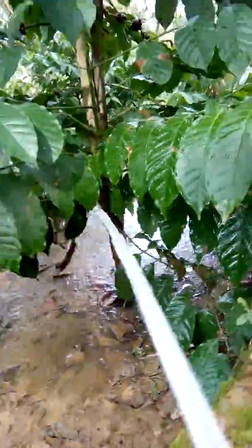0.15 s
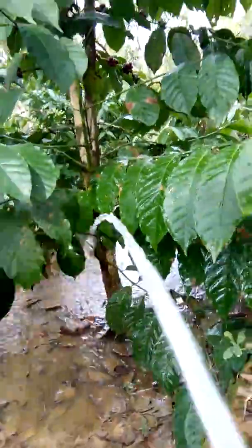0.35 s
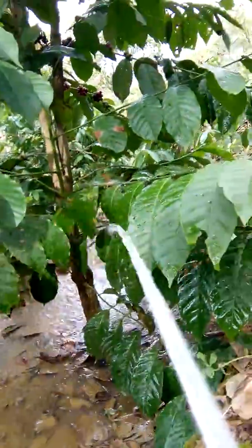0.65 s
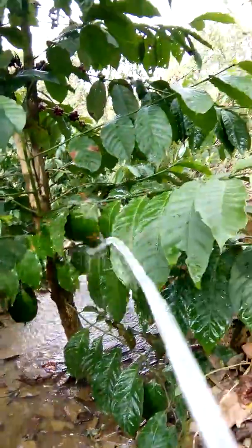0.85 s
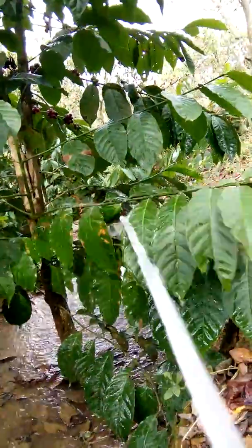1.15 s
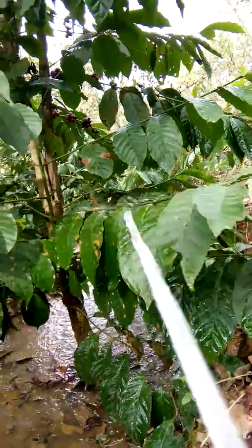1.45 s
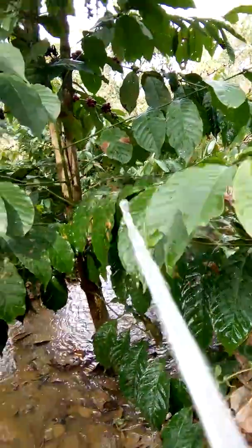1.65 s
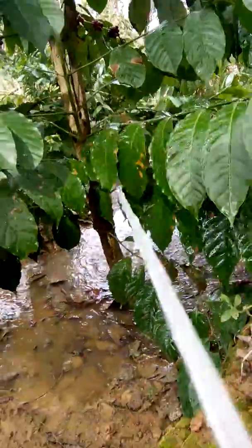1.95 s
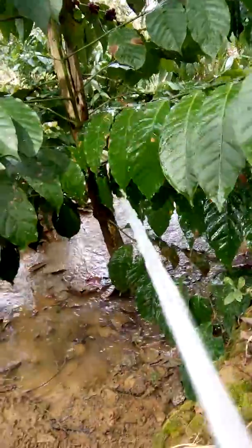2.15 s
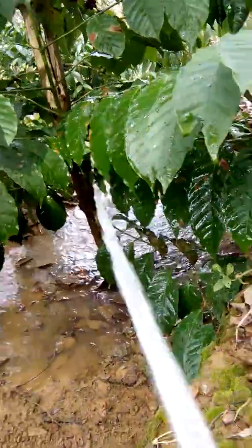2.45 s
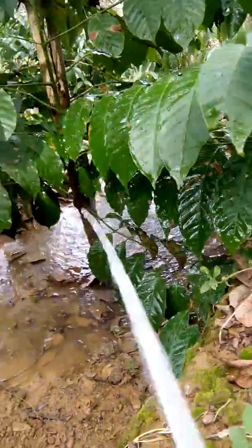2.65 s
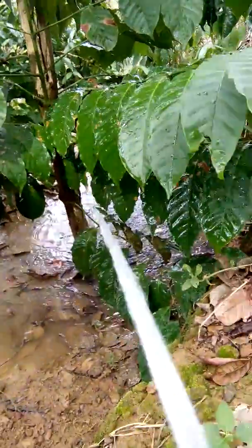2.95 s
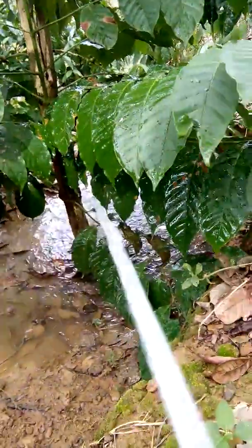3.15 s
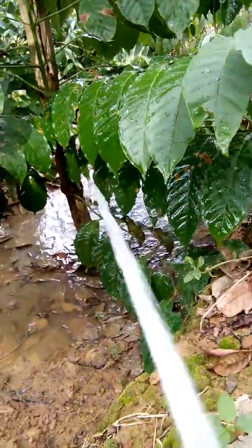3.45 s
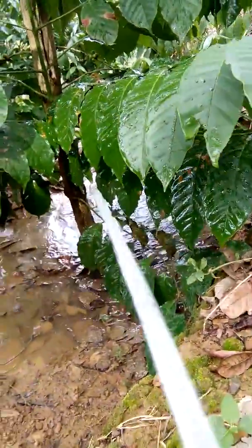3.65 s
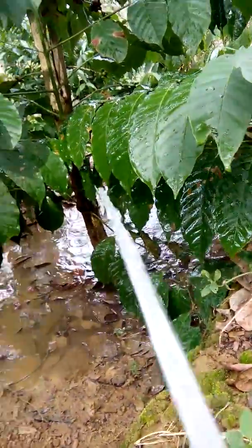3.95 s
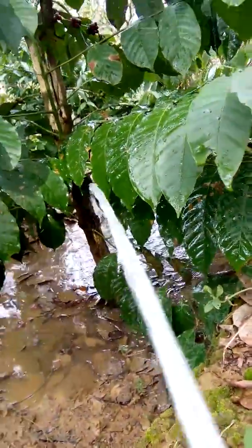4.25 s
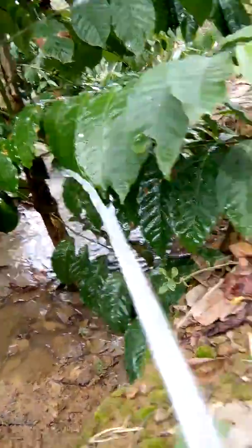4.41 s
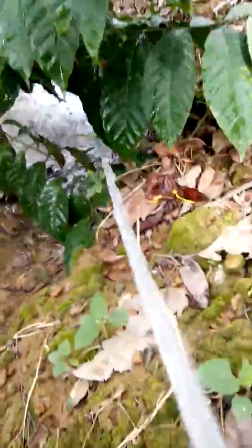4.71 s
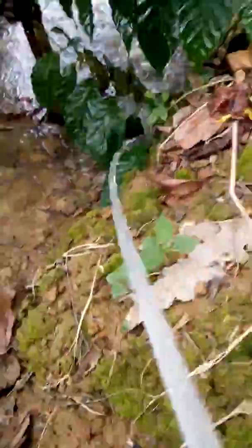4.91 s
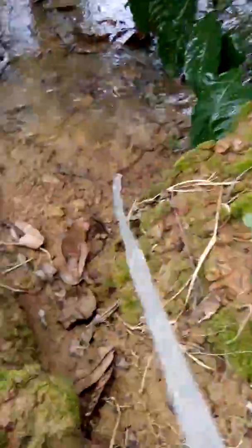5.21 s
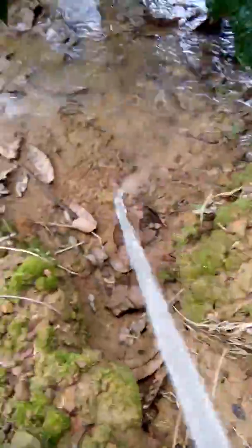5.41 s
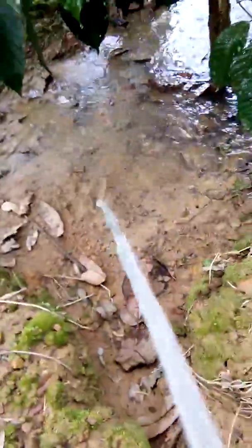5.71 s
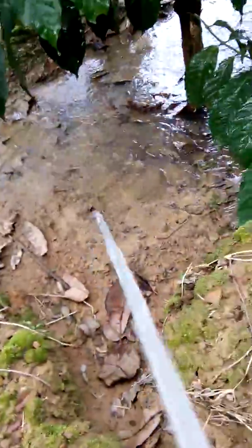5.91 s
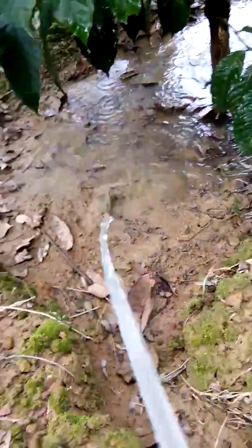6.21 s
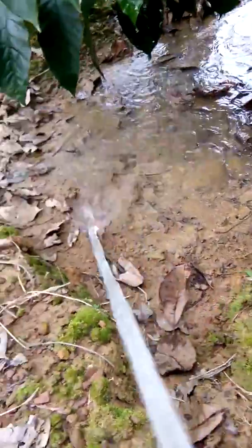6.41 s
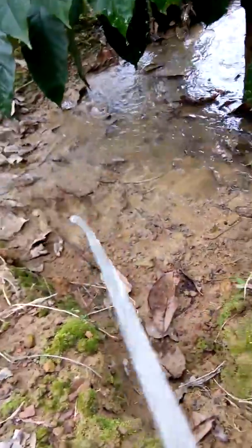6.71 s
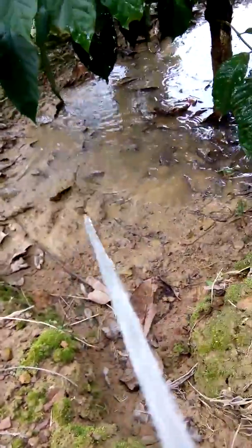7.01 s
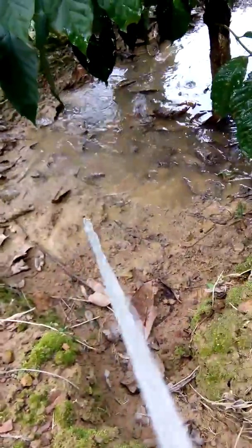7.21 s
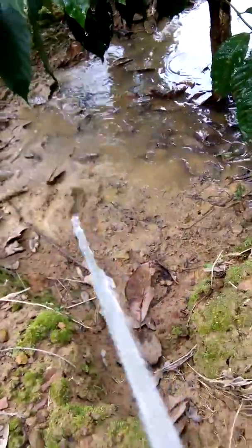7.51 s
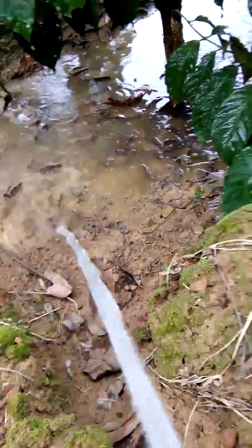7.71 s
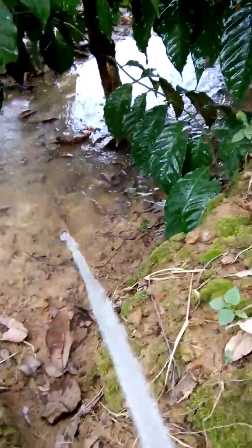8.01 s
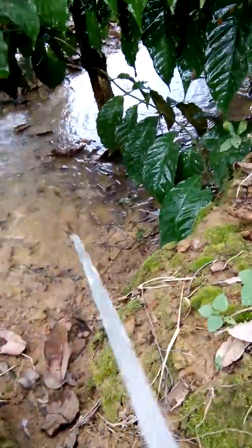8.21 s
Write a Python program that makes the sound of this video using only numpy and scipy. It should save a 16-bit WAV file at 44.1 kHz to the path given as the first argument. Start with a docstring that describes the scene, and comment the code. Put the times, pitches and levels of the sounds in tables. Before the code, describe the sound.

A strong hose jet spatters crisply on broad leaves, churns and gurgles in a muddy puddle, then hisses and crackles harder on wet soil.

```python
"""A hose jet spatters on broad leaves, moves to a muddy puddle, then swings down onto bare wet soil.
The jet breaks into slugs: each bursts into noise, droplets and small ringing bubbles, coloured by the surface.
Heavier drops drum, the puddle churns, squelches and gurgles, and the finest spray hisses as mist.
Single slaps, cracks, plops and soft ticks are short noise bursts or bubble rings; the grip creaks once in pulses.
Faint air noise lies beneath. Open air, one microphone."""
import sys
import numpy as np
from scipy import signal
from scipy.fft import rfft, irfft, next_fast_len
from scipy.io import wavfile
from scipy.ndimage import uniform_filter1d, map_coordinates

SR = 44100
rng = np.random.default_rng(int(sys.argv[2]) if len(sys.argv) > 2 else 0)


def transcribe(signal):
    """Save signal, clipped to [-1, 1], as a 16-bit WAV file at the path in sys.argv[1]."""
    frames = np.atleast_2d(signal).T
    limited = np.clip(frames, -1, 1)
    pcm = np.round(limited * 32767).astype(np.int16)
    wavfile.write(sys.argv[1], SR, pcm)


N = 368676  # length [samples]

# Levels in the tables are set before each layer's own trim.
# where the jet lands: (time [s], surface [0 leaves, 1 puddle, 2 soil])
AIM = [(0, 0), (1.9, 0), (2.3, 1), (4.35, 1), (4.55, .2), (4.8, 1), (5.05, 2), (8.36, 2)]
# force of the splatter as the hand sweeps the jet about: (time [s], level [dB])
FORCE = [(0.0, -40.5), (0.25, -38.5), (0.5, -39), (0.68, -42.0), (1.17, -40), (1.28, -45), (1.5, -33.5),
         (1.75, -33.5), (1.85, -39), (1.98, -47), (2.14, -39), (2.22, -47), (2.31, -35.5), (2.65, -39.5),
         (2.95, -38.5), (3.65, -41.5), (4.5, -38.5), (4.95, -39.5), (5.06, -38.5), (5.2, -34.5),
         (5.55, -37), (5.75, -34.5), (5.86, -35.5), (5.97, -26.5), (6.1, -36), (6.25, -39), (6.36, -32),
         (6.5, -35), (6.58, -33), (6.9, -33.5), (7.15, -35), (7.7, -32.5), (7.91, -39), (8.03, -34.5),
         (8.36, -35.5)]
# fineness of the spray: (time [s], sizzle gain over the coarse splatter [dB])
SPRAY = [(0.0, -3.5), (0.35, 4), (0.75, 2.5), (1.1, -2), (1.75, -3), (2.25, 4.5), (2.47, -3.5), (2.86, 7.5),
         (3.2, -1.5), (4.0, -3.5), (4.9, 2.5), (5.15, -1), (5.55, 6), (5.86, 8.5), (5.98, -7), (6.22, 4.5),
         (6.5, 7), (6.6, -1), (6.82, 1), (6.97, -1.5), (7.1, -1), (7.68, -1.5), (7.85, 15.5), (8.02, 4),
         (8.36, 6)]
# colour of the splatter on each surface: (frequency [Hz], relative level per Hz [dB])
SPLATTER_ON_LEAVES = [(1000, -32), (1600, -29), (1850, -6.5), (2100, -9.5), (2470, 0.5), (2750, -1),
                      (3100, -1), (3500, -4.5), (4300, -2.5), (5500, -8), (6500, -11.5), (8100, -30.5),
                      (10500, -30), (15500, -40)]
SPLATTER_ON_PUDDLE = [(1200, -49), (1800, -16.5), (2400, -4.5), (2950, 0.5), (3600, -3.5), (4350, 0),
                      (4900, -4.5), (5250, -4.5), (6200, -11), (6550, -9.5), (8000, -28.5), (10300, -30.5),
                      (15500, -52)]
SPLATTER_ON_SOIL = [(1200, -46), (1750, -17), (2200, -12.5), (2450, -2.5), (2850, 1.5), (3750, -3.5),
                    (4500, 2.4), (5200, -0.5), (6450, -8), (7000, -17), (8600, -31.5), (11300, -33),
                    (15500, -60)]
# close reflections from leaves, puddle and soil: (share [gain])
NEAR_ECHO_SHARE = [0.35, 0.5, 0.39]

# uneven bunches in the stream on leaves, puddle and soil: (flutter depth [dB])
FLUTTER_DEPTH = [0.57, 0.86, 1.4]
FLUTTER_PER_S = 17
# spurts of extra water: (middle [s], length [s], gain [dB])
SPURTS = [(0.087, 0.028, 0), (0.513, .05, 1.5), (0.878, 0.057, 3), (2.143, 0.025, 8), (2.926, 0.063, 4),
          (3.461, 0.041, 6), (4.887, 0.022, 4.5), (4.967, 0.091, 5), (5.402, 0.057, 1), (5.718, .05, 1.5),
          (6.57, 0.046, 2), (6.842, 0.035, 1.5), (7.06, 0.032, 0.5)]
# the jet thins or breaks off; depths of 0 or less leave it whole: (middle [s], length [s], depth [dB])
BREAKS = [(0.292, 0.019, 2), (3.076, 0.048, 10), (3.126, 0.046, 2.5), (3.299, 0.027, 15.5),
          (4.834, 0.036, 9), (5.497, 0.053, -2), (5.567, .04, 3), (5.843, .05, 5), (6.534, 0.031, 4),
          (6.69, 0.024, 3), (7.025, .025, 5), (8.14, 0.036, 0)]
LULL_S, LULL_DB = 0.015, 1.5  # half-height width and depth of the thinning while a big slug gathers

# level of the airy mist: (time [s], level [dB])
MIST_LEVEL = [(0, -73), (0.26, -65), (0.32, -55), (0.42, -68), (0.68, -68), (0.82, -66), (1.35, -71),
              (1.5, -70), (1.66, -56), (1.76, -69), (1.87, -64), (1.98, -74), (2.28, -62.5), (2.5, -69),
              (2.87, -53.5), (3.0, -60), (3.12, -67), (3.4, -69), (3.9, -73), (4.42, -65), (4.85, -64),
              (5.5, -54), (5.9, -53), (6.08, -55), (6.6, -56.5), (6.76, -49.5), (7.2, -58), (7.5, -60),
              (7.72, -54.5), (8.05, -56), (8.2, -53.5), (8.36, -56)]
# colour of the mist's hiss: (frequency [Hz], relative level per Hz [dB])
MIST_COLOUR = [(5000, -41), (7500, -6), (10000, -13), (11300, -4.5), (11900, -1.5), (12750, 2), (13700, -5),
               (15500, -15)]

# levels of the heavy water: (time [s], drumming level [dB], churning level [dB])
HEAVY = [(0.0, -48.5, -55.5), (0.2, -51, -57), (0.35, -59.5, -66), (0.47, -53.5, -57), (0.68, -49.5, -59.5),
         (0.88, -44.5, -52.5), (1.17, -45.5, -53.5), (1.27, -50.5, -58), (1.48, -45, -51),
         (1.75, -45.5, -54.5), (1.98, -53, -62), (2.12, -45, -55), (2.23, -58, -66), (2.44, -53, -65.5),
         (2.7, -50.5, -56.5), (3.04, -60.5, -65.5), (3.2, -48.5, -52.5), (3.35, -55, -55.5),
         (3.45, -51.5, -57.5), (3.65, -50.5, -53.5), (4.05, -51.5, -58), (4.38, -51.5, -57.5),
         (4.6, -48, -55), (4.87, -53.5, -60.5), (5.0, -53.5, -55), (5.09, -59.5, -58), (5.2, -51, -61.5),
         (5.45, -62, -57.5), (5.63, -58, -68.5), (5.8, -59.5, -52.5), (5.98, -50, -57), (6.2, -57, -60.5),
         (6.48, -61.5, -69.5), (6.6, -50.5, -55.5), (6.69, -56, -64), (6.78, -52, -57.5),
         (6.93, -59, -67.5), (7.13, -48, -55), (7.25, -51.5, -60), (7.34, -51, -48), (7.42, -46.5, -47),
         (7.55, -54, -58), (7.68, -53, -62), (7.79, -63.5, -73), (7.9, -57.5, -53), (8.08, -62, -63.5),
         (8.2, -53.5, -52.5), (8.27, -63.5, -61), (8.36, -47.5, -53)]
# colour of heavy drops on each surface: (frequency [Hz], relative level per Hz [dB])
DRUM_ON_LEAVES = [(400, -18), (720, -13.5), (950, 0.5), (1100, -5), (1380, 3), (1600, -3.5), (1900, -0.5),
                  (2800, -3.5), (5000, -49)]
DRUM_ON_PUDDLE = [(400, -34), (770, -14), (950, -3.5), (1100, -5.5), (1280, 3), (1550, -1.5), (1780, -10),
                  (2200, -4), (5000, -41)]
DRUM_ON_SOIL = [(300, -21), (600, -7.5), (750, -2.5), (870, -3), (1220, 2), (1500, -3.5), (1750, -5.5),
                (2100, -0.5), (5000, -43)]
# colour of the churning: (frequency [Hz], relative level per Hz [dB])
CHURN_COLOUR = [(20, -48), (42, -42), (80, -12.5), (130, -6), (195, -1.5), (300, -4), (520, -0.5),
                (720, -5.5), (1100, -29), (2500, -30)]
# deep thud under the jet on leaves, puddle and soil: (gain [dB])
THUD_GAIN = [3, 0.5, 0.5]
THUD_FOLLOWS = 0.49  # dB of thud per dB of churning

# bubbles swarm in the hole bored by the jet: (middle [s], length [s], level [dB], pitch [Hz])
SQUELCHES = [(1.184, 0.024, -37, 3080), (1.52, 0.14, -42, 2610), (1.72, 0.16, -37, 2584),
             (5.988, 0.076, -31, 2766), (6.976, 0.1, -32, 2865), (7.678, 0.039, -34, 3040)]
# the jet's hollow fills in: (time [s], length [s], first pitch [Hz], last pitch [Hz], level [dB])
GURGLES = [(2.51, 0.056, 493, 426, -37), (3.2, 0.065, 149, 195, -46), (3.431, .06, 227, 385, -40),
           (3.511, 0.066, 230, 487, -38.5), (3.594, .06, 240.2, 450, -36), (3.67, 0.041, 270, 470, -38),
           (3.725, 0.042, 240, 520, -38), (3.8, 0.029, 260, 450, -41), (3.894, .02, 260, 484, -42),
           (3.991, 0.067, 230, 557, -33.5), (4.242, 0.098, 523, 540, -39.5), (4.962, 0.075, 290, 330, -42)]
GURGLE_PER_S = 170  # bubbles a second in a chain, at least two in all
GURGLE_SCATTER = 0.28  # octaves by which the bubbles stray from the chain's glide
# the jet rakes across leaves: (middle [s], length [s], level [dB])
LEAF_PATTER = [(1.77, 0.1, -43.5), (4.55, 0.095, -48), (4.673, 0.08, -45)]

# big slugs slapping down: (time [s], level [dB], centre [Hz], width [octaves])
SLAPS = [(0.1942, -32, 4200, .8), (0.2147, -32, 3080, 0.92), (0.321, -34, 3700, .9),
         (0.332, -32, 3300, 1.4), (0.411, -29.5, 4050, 0.55), (0.493, -35, 3200, 0.97),
         (0.517, -36, 4850, .6), (0.5508, -32, 4150, 0.68), (0.561, -32.5, 4440, 0.65),
         (1.181, -34, 2610, 1.3), (2.1928, -35, 4070, 0.9), (2.236, -37.5, 4440, 0.96),
         (2.312, -27.5, 3780, 0.82), (2.325, -30.5, 4300, 1), (2.362, -27.5, 3360, 0.56),
         (2.774, -23.5, 2650, 1.5), (2.7895, -30, 3820, 1.3), (2.923, -27, 3280, 0.84),
         (3.089, -27.5, 3250, 1.15), (3.1853, -24, 3930, 0.89), (3.2055, -30.5, 4060, 1.8),
         (3.2496, -34.5, 3540, 1), (3.2702, -30, 2620, 0.77), (3.326, -34, 2770, 2.4),
         (3.8155, -36.5, 2720, 0.75), (4.33, -29, 2840, 0.82), (4.3852, -30.5, 2850, 0.6),
         (4.487, -30, 2600, 1.3), (4.52, -30, 2830, 2), (4.531, -30, 1840, 1.7), (4.564, -43, 1800, 1.3),
         (4.637, -36, 1900, 2.4), (4.681, -32, 1730, 1.5), (5.8892, -28, 3840, 1.2),
         (5.919, -25, 3260, 0.72), (5.945, -27, 3500, 0.71), (6.56, -30, 4800, 0.68),
         (7.042, -28, 4830, 0.72), (7.977, -32.5, 4500, 0.93), (8.342, -24, 5200, 0.5)]
# single hard drops cracking on leaf or grit: (time [s], level [dB], centre [Hz])
CRACKS = [(0.1816, -24, 3900), (0.2155, -19, 3300), (1.098, -21.5, 2640), (1.4187, -23, 3100),
          (1.4367, -21, 2630), (1.4875, -17, 4000), (1.537, -26, 3010), (1.621, -14, 2700),
          (1.6773, -21, 2560), (1.7385, -17, 2880), (1.909, -19, 3300), (2.078, -24, 4100),
          (2.545, -20, 4000), (2.6075, -28, 4100), (2.696, -19, 4000), (2.8295, -22, 4300),
          (5.3715, -20, 4500), (5.3956, -16, 4500), (5.4755, -23, 3200), (5.689, -13, 3700),
          (5.75, -12, 4000), (5.776, -16, 3770), (5.826, -21, 4730), (5.901, -17, 3880),
          (5.9495, -16, 3300), (5.9825, -13, 3300), (6.045, -17, 3100), (6.0985, -17, 4760),
          (6.292, -20, 5000), (6.345, -14.5, 4150), (6.377, -15, 4220), (6.449, -21, 5100),
          (6.607, -14.5, 4530), (6.719, -24, 4240), (6.7368, -12.5, 3600), (6.7735, -17, 4240),
          (6.821, -13, 5000), (6.842, -12, 4300), (7.185, -18, 4900), (7.2185, -22, 4200),
          (7.29, -19, 4070), (7.722, -17, 4900), (7.9765, -17, 4500), (8.082, -16, 4600)]
CRACK_S, CRACK_OCTAVES = 0.0014, 0.69  # decay time and width of a crack
# large air pockets closing in the puddle: (time [s], level [dB], pitch [Hz])
PLOPS = [(2.513, -37, 500), (2.558, -33, 1280), (3.14, -32, 990), (3.436, -42, 217), (3.571, -37, 503),
         (3.698, -42, 466), (3.757, -34, 470), (3.961, -34, 1395), (4.019, -35.5, 385), (4.052, -28, 1289),
         (4.076, -25.5, 1270), (4.121, -28.5, 512), (4.27, -30, 1228)]
# soft ticks of stray drops close by: (time [s], level [dB], centre [Hz])
TICKS = [(0.0605, -28, 1200), (0.179, -30, 1090), (0.263, -32, 1200), (0.2947, -33, 1100),
         (0.397, -34, 1000), (0.605, -31, 1300), (0.874, -27, 1240), (1.313, -31, 1160),
         (1.82, -25.5, 1400), (2.052, -27.5, 1400), (2.2625, -29.5, 1150), (2.757, -29.5, 1050),
         (4.5857, -29, 1250), (5.536, -31, 1230), (6.848, -29.5, 1240), (7.035, -30, 1340),
         (7.962, -30.5, 1250), (8.076, -29.5, 1300)]
TICK_S, TICK_OCTAVES = 0.0028, 0.98  # decay time and width of a tick's wet smear

# what the grip rings with: (frequency [Hz], gain [dB])
GRIP = [(100, -17), (350, -10.5), (650, -3), (1000, 2), (1400, -8), (1950, -4.5), (2500, -31), (4000, -50)]
CREAK_S, CREAK_DB = 2.886, 0.6  # start, and strength of the middle slip ahead of the grip's ring
SLIP_GAP_S, SLIP_SLOWS_S = 0.0069, 0.0009  # first gap between slips, and what each next gap adds
CREAK_FADE_DB = 3.5  # the first and last slips are this much weaker than the middle one

# colour of the still air: (frequency [Hz], relative level per Hz [dB])
AIR_COLOUR = [(20, -25), (45, -21), (90, -6), (190, -1.5), (280, 0), (450, -23), (1500, -20.5),
              (6000, -11.5), (15000, -51)]
TOP_HZ = 15650  # band limit of the recorder


def slugs(rate, spread_db, life, between):
    """A broken stream: each slug lands at once and dies away over a share of unbroken flow."""
    hits = impacts(rate, spread_db)
    power = signal.lfilter([1], [1, -np.exp(-2 / (life * SR))], hits ** 2)
    return np.sqrt(power / power.mean() + between)


def flow_db():
    """Water arriving from moment to moment: random flutter, spurts, breaks, and a lull before each big slug."""
    gaps = sum(depth * swell(s, length) for s, length, depth in BREAKS)
    spurts = sum(gain * swell(s, length) for s, length, gain in SPURTS)
    lulls, shape = np.zeros(N), np.hanning(max(int(2 * LULL_S * SR), 3))
    for s, *_ in SLAPS:
        add(lulls, s - 2.1 * LULL_S, shape)
    thinning = np.maximum(gaps, LULL_DB * np.minimum(lulls, 1))
    return under_jet(FLUTTER_DEPTH) * wobble(FLUTTER_PER_S) + spurts - thinning


def splatter(stream, arriving_db):
    """Bursting splashes, droplets and small ringing bubbles where the jet lands."""
    splash = splashes(centre_hz=3960, octaves=0.62, sharpness=1.74, life=0.0026, spread_db=3.0,
                      wander=0.13, count=5500, size=512)
    fizz = bubbles(stream, centre_hz=3597, octaves=0.405, cycles=9.1, rise=0.03, spread_db=0.0,
                   count=3500, size=700)
    spray = droplets(stream, rate=2400, spread_db=2.0)
    grit = droplets(stream, rate=110, spread_db=4.0)
    burst = whitened(splash + amp(-7.0) * fizz + amp(2.0) * spray + amp(-6.0) * grit)
    x = landed(burst, [SPLATTER_ON_LEAVES, SPLATTER_ON_PUDDLE, SPLATTER_ON_SOIL])
    x = near_echoes(x, share=under_jet(NEAR_ECHO_SHARE), sway=0.045, count=7)
    x = shifting(x, depth_db=1.64, width_hz=239.5, life=0.08)
    # a finer spray sizzles more
    sizzle = above(x, 3870, order=8)
    coarse = x - sizzle
    x = coarse + amp(curves(SPRAY)[0] + 0.95 * wobble(12)) * sizzle
    return amp(curves(FORCE)[0] + arriving_db - 0.3) * steady(x, window=0.091)


def splashes(centre_hz, octaves, sharpness, life, spread_db, wander, count, size):
    """Decaying noise bursts vary in loudness, life and pitch; their mean pitch wanders as the jet moves."""
    start = rng.integers(0, N, count)
    pitch, loud, length = np.clip(rng.standard_normal((3, count, 1)), -2, 2)
    t = np.arange(size) / SR
    decay = np.exp(-t / (life * 2 ** (length / 2)))
    bursts = rng.standard_normal((count, size)) * decay * amp(spread_db * loud)
    hz = centre_hz * 2 ** (octaves * pitch + wander * wobble(9)[start, None])
    # a resonance tuned to each burst's own pitch
    ratio = (np.fft.rfftfreq(size, 1 / SR) + 1) / hz
    bursts = irfft(rfft(bursts) / (1 + 1j * sharpness * (ratio - 1 / ratio)), size)
    return scattered(start, bursts)


def droplets(strength, rate, spread_db):
    """Tiny impacts thrown by the slugs."""
    return unit(strength * impacts(rate, spread_db) * rng.choice([-1, 1], N))


def bubble(t, hz, cycles, rise):
    """A trapped air pocket rings for some cycles, its pitch rising as it nears the surface."""
    age = hz * t / cycles
    envelope = np.exp(-age) * (1 - np.exp(-2 * hz * t))
    return envelope * np.sin(2 * np.pi * hz * t * (1 + rise * age / 2))


def bubbles(strength, centre_hz, octaves, cycles, rise, spread_db, count, size):
    """A cloud of count bubbles, size samples each, louder where the stream is strong."""
    start = rng.integers(0, N, count)
    pitch, loud = np.clip(rng.standard_normal((count, 2)), -2, 2).T
    rings = bubble(np.arange(size) / SR, centre_hz * 2 ** (octaves * pitch[:, None]), cycles, rise)
    rings = rings * (strength[start] * amp(spread_db * loud))[:, None]
    return scattered(start, rings)


def mist(stream, arriving_db):
    """The finest drops hiss at the very top, and a few prickle one by one."""
    hiss = steady(droplets(stream, rate=6000, spread_db=1), window=0.053)
    prickle = droplets(stream, rate=70, spread_db=4.5)
    x = unit(coloured(hiss + amp(-5.5) * prickle, MIST_COLOUR))
    x = shifting(x, depth_db=1.9, width_hz=330, life=0.22)
    return amp(curves(MIST_LEVEL)[0] + 0.5 * arriving_db + 1.6 * wobble(13) + 0.7) * x


def drumming(stream, arriving_db):
    """Heavy drops patter on the surface under the jet and trap larger bubbles."""
    patter = droplets(stream, rate=1100, spread_db=2)
    pockets = bubbles(stream, centre_hz=1362, octaves=0.397, cycles=18.4, rise=0.034, spread_db=3.0,
                      count=1500, size=900)
    x = landed(patter + amp(-15.0) * pockets, [DRUM_ON_LEAVES, DRUM_ON_PUDDLE, DRUM_ON_SOIL])
    x = steady(near_echoes(x, share=0.17, sway=0.063, count=4), window=0.081)
    # the heavy drops arrive in loose bunches
    return amp(curves(HEAVY)[0] + 0.45 * arriving_db + 2.64 * wobble(15)) * x


def churning(stream, arriving_db):
    """The jet digs in: low thuds and big, well damped bubbles."""
    thuds = droplets(stream, rate=1200, spread_db=5)
    glugs = bubbles(stream, centre_hz=332.2, octaves=0.603, cycles=6.25, rise=0.083, spread_db=2.5,
                    count=700, size=3000)
    x = unit(coloured(thuds, CHURN_COLOUR)) + amp(-3) * unit(coloured(glugs, CHURN_COLOUR))
    x = steady(x, window=0.13)
    # harder churning mostly lifts the upper part; the deep thud follows it only in part
    level_db = curves(HEAVY)[1] + 0.66 * arriving_db + 2.15 * wobble(11)
    mean_db = level_db.mean()
    thud_db = mean_db + THUD_FOLLOWS * (level_db - mean_db) + under_jet(THUD_GAIN)
    upper = above(x, 200, order=4)
    return amp(level_db - 0.9) * upper + amp(thud_db) * (x - upper)


def squelches(stream):
    """Bubbles of nearly one size crowd into the hole under the jet."""
    track = np.zeros(N)
    for s, length, db, hz in SQUELCHES:
        swarm = bubbles(stream, hz, octaves=0.065, cycles=19, rise=0.016, spread_db=2.5,
                        count=4000, size=400)
        track += amp(db) * swell(s, length) * swarm
    return track


def gurgles():
    """A closing hollow sheds a dense, ragged chain of bubbles whose pitch glides, mostly upwards."""
    track, t = np.zeros(N), np.arange(SR // 15) / SR
    for s, length, first_hz, last_hz, db in GURGLES:
        for stage in np.linspace(0, 1, max(int(length * GURGLE_PER_S), 2)):
            hz = (first_hz + stage * (last_hz - first_hz)) * 2 ** rng.normal(0, GURGLE_SCATTER)
            ring = rng.choice([-1, 1]) * bubble(t, hz, cycles=1.8, rise=0.054)
            onset = s + stage * length + rng.normal(0, 0.00197)
            add(track, onset, amp(db - 5.5 + rng.normal(0, 2.4)) * ring)
    return track - above(track, 750, order=14)


def leaf_patter():
    """The jet rakes across broad leaves: a dense, uneven crackle of short dull taps."""
    taps = splashes(centre_hz=1620, octaves=0.33, sharpness=2.1, life=0.0011, spread_db=5.5,
                    wander=0.088, count=3000, size=512)
    taps = steady(band(taps, 1550, octaves=1.7, order=3), window=0.06)
    return taps * sum(amp(db) * swell(s, length) for s, length, db in LEAF_PATTER)


def slaps():
    """A big slug cracks on the surface and its droplets follow; a single hard drop only cracks."""
    track, t = np.zeros(N), np.arange(SR // 20) / SR
    for s, db, hz, octaves in SLAPS:
        burst = rng.choice([-1, 1], len(t)) * (np.exp(-t / 0.0029) + 1.4 * np.exp(-t / 0.011))
        burst[0] = 5  # the first contact is one sharp impact
        slap = band(burst, hz, octaves, order=3)
        add(track, s, amp(db - 2.5) * slap / slap[:SR // 200].std())  # level set by the first 5 ms
    for s, db, hz in CRACKS:
        burst = rng.choice([-1, 1], len(t)) * np.exp(-t / CRACK_S)
        burst[0] = 6  # the drop's impact, ahead of its scatter
        crack = band(burst, hz, CRACK_OCTAVES, order=3)
        add(track, s, amp(db - 3.5) * crack / np.abs(crack).max())
    return track - above(track, 7150, order=12)


def drips():
    """Single plops ring as bubbles in the puddle; stray drops near by make soft, wet little ticks."""
    track, t = np.zeros(N), np.arange(SR // 20) / SR
    for s, db, hz in PLOPS:
        add(track, s, amp(db + 0.5) * bubble(t, hz, cycles=2.8, rise=0.024))
    for s, db, hz in TICKS:
        smear = rng.choice([-1, 1], len(t)) * np.exp(-t / TICK_S)
        smear[0] = 16  # the drop's first contact
        tick = band(smear, hz, TICK_OCTAVES, order=2)
        add(track, s, amp(db - 0.5) * tick / np.abs(tick).max())
    return track - above(track, 2000, order=8)


def creak(count=9):
    """The grip sticks and slips: a short run of dry pulses that swells, slows down and fades."""
    slips, s = np.zeros(N), CREAK_S
    for k, stage in enumerate(np.linspace(-1, 1, count)):
        strength_db = CREAK_DB - CREAK_FADE_DB * stage ** 2 + rng.normal(0, 1.4)
        add(slips, s + rng.normal(0, 0.00055), [amp(strength_db)])
        s += SLIP_GAP_S + k * SLIP_SLOWS_S
    return coloured(slips, GRIP)


def still_air():
    """Quiet coloured noise of the open air."""
    return amp(-63.5) * unit(coloured(rng.standard_normal(N), AIR_COLOUR))


def landed(x, spectra):
    """Colour x by the surface under the jet, cross-fading as the aim moves."""
    aim = np.clip(curves(AIM)[0], 0, len(spectra) - 1)
    track = np.zeros(N)
    for k, surface in enumerate(spectra):
        share = np.maximum(1 - np.abs(aim - k), 0)
        track += share * unit(coloured(x, surface))
    return track


def under_jet(values):
    """One value for each surface, blended as the aim moves."""
    return np.interp(curves(AIM)[0], np.arange(len(values)), values)


def near_echoes(x, share, sway, count):
    """Ground, leaves and hand return copies within about 4 ms; drifting paths make the colour swish."""
    n, echoes = np.arange(N), np.zeros(N)
    for delay in np.geomspace(0.0007, 0.004, count):
        path = delay * (1 + sway * wobble(1.51)) * SR
        echoes += wobble(2.028) * map_coordinates(x, [n - path], order=3)
    return x + share * echoes / np.sqrt(count)


def shifting(x, depth_db, width_hz, life):
    """The splash keeps changing shape: bright and dull bands come and go, each for about life seconds."""
    hz, t, z = signal.stft(x, SR, nperseg=512)
    grid = np.meshgrid(hz / width_hz, t / life, indexing="ij")
    field = map_coordinates(rng.standard_normal((128, 256)), grid, mode="mirror")
    return signal.istft(z * amp(depth_db * field), nperseg=512)[1][:N]


def whitened(x):
    """Even out the long-term spectrum, so that the surface alone sets the colour."""
    hz, power = signal.welch(x, SR, nperseg=128, detrend=False)
    return unit(coloured(x, np.column_stack([hz + 1, -10 * np.log10(power)])))


def coloured(x, spectrum):
    """Causal minimum-phase filter through (Hz, dB) points, built from the folded cepstrum."""
    m = 2 * next_fast_len(N // 2 + 4096)
    hz, db = np.transpose(spectrum)
    gain = amp(np.interp(np.log(np.fft.rfftfreq(m, 1 / SR) + 1), np.log(hz), db))
    cepstrum = irfft(np.log(gain), m)
    cepstrum[1:m // 2] *= 2
    cepstrum[m // 2 + 1:] = 0
    return irfft(rfft(x, m) * np.exp(rfft(cepstrum)), m)[:N]


def above(x, edge_hz, order):
    """The part of x above a soft edge."""
    m = 2 * next_fast_len(N)
    ratio = (np.fft.rfftfreq(m, 1 / SR) / edge_hz) ** order
    return irfft(rfft(x, m) * ratio / (1 + ratio))[:N]


def band(x, hz, octaves, order):
    """Keep a band so many octaves wide around hz."""
    half = 2 ** (octaves / 2)
    edges = [hz / half, min(hz * half, SR / 3)]
    return signal.sosfilt(signal.butter(order, edges, "band", fs=SR, output="sos"), x)


def impacts(rate, spread_db):
    """Random impulses, rate a second, of log-normal size with the extremes clipped."""
    size = amp(spread_db * np.clip(rng.standard_normal(N), -2, 2))
    return (rng.random(N) < rate / SR) * size


def wobble(rate):
    """A smooth random curve, rate knots a second."""
    knots = rng.standard_normal(int(N * rate / SR) + 4)
    return map_coordinates(knots, [np.arange(N) * rate / SR])


def swell(s, length):
    """A bell of height 1 around time s, length seconds wide where it has fallen to 1/e."""
    return np.exp(-np.minimum((2 * (np.arange(N) / SR - s) / length) ** 2, 40))


def curves(rows):
    """One value per sample for each column after the time."""
    s, *cols = np.transpose(rows)
    return [np.interp(np.arange(N) / SR, s, c) for c in cols]


def scattered(start, sounds):
    """Sum one sound per row at its start sample, then scale to rms 1."""
    index = start[:, None] + np.arange(sounds.shape[1])
    return unit(np.bincount(index.ravel(), sounds.ravel(), N)[:N])


def add(track, s, sound):
    """Mix a sound into the track at time s."""
    start = max(round(s * SR), 0)
    track[start:start + len(sound)] += sound[:max(N - start, 0)]


def steady(x, window):
    """Hold the rms near 1 over windows of seconds: the hose delivers water at an even rate."""
    size = max(int(window * SR), 2)
    power = uniform_filter1d(uniform_filter1d(x ** 2, size), size // 2)
    return x / np.sqrt(np.abs(power) + 1e-12)


def unit(x):
    """Scale to rms 1."""
    return x / np.sqrt(np.mean(x ** 2) + 1e-20)


def amp(db):
    """Decibels to gain."""
    return 10 ** (np.asarray(db) / 20)


def scene():
    """One broken stream drives splatter, mist, drumming and churning over quiet air."""
    stream = slugs(rate=220, spread_db=3.5, life=0.004, between=0.99)
    arriving_db = flow_db()
    jet = sum(layer(stream, arriving_db) for layer in (splatter, mist, drumming, churning))
    details = squelches(stream) + gurgles() + leaf_patter() + slaps() + drips() + creak()
    return (jet + details + still_air())[None]


def record(dry):
    """The recorder keeps nothing above its band limit."""
    m = next_fast_len(N + SR // 10)
    passed = np.fft.rfftfreq(m, 1 / SR) < TOP_HZ
    return irfft(rfft(dry, m) * passed, m)[:, :N]


dry = scene()
out = record(dry)
transcribe(out)
```